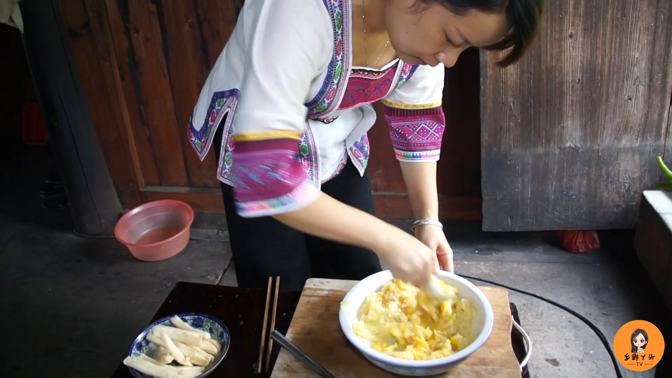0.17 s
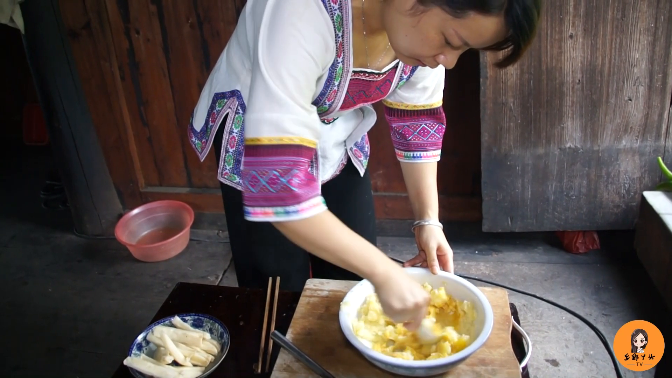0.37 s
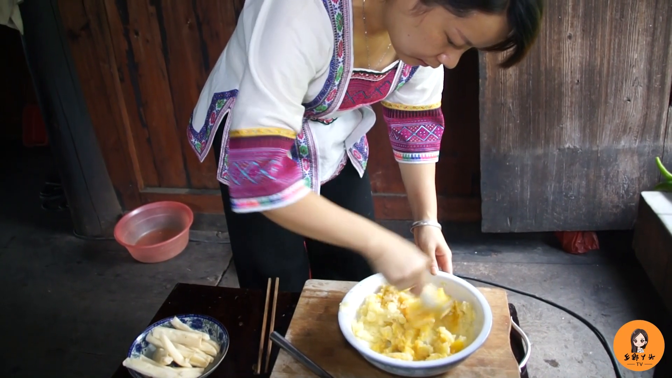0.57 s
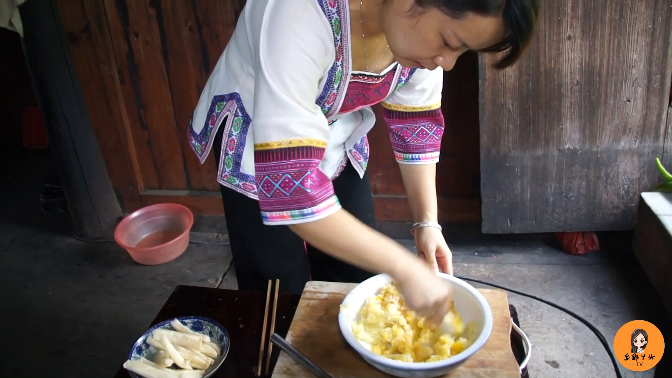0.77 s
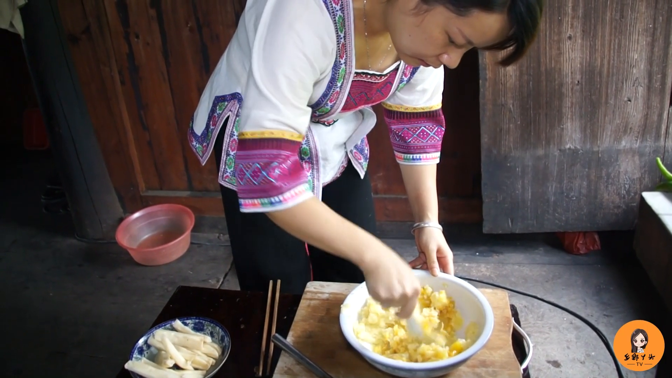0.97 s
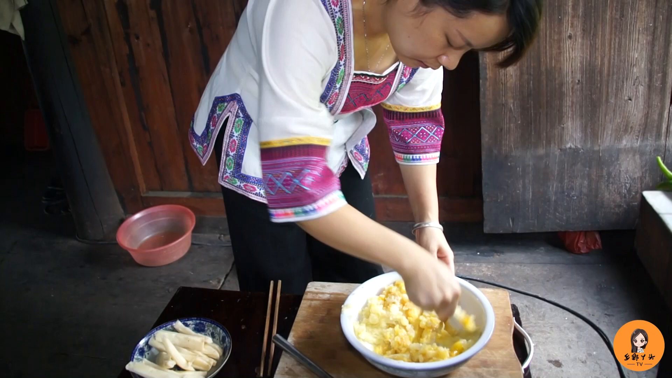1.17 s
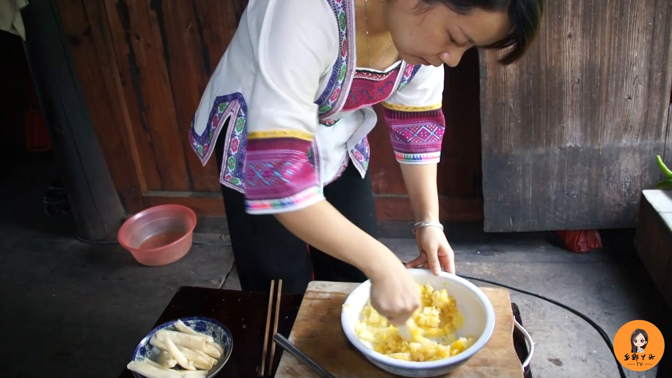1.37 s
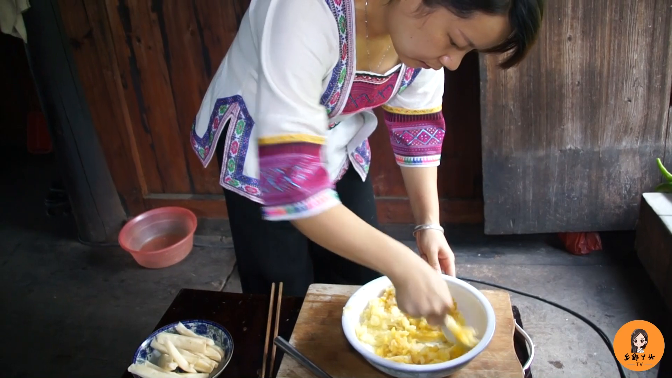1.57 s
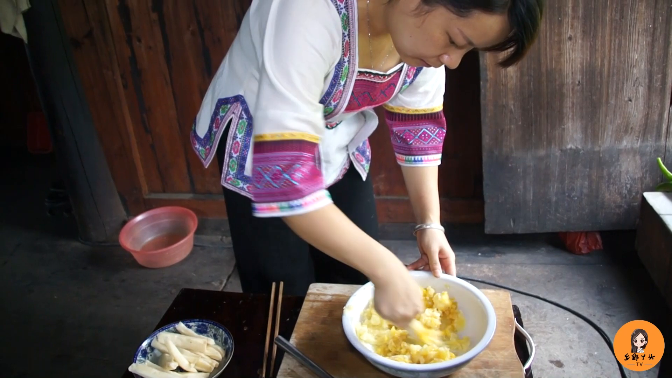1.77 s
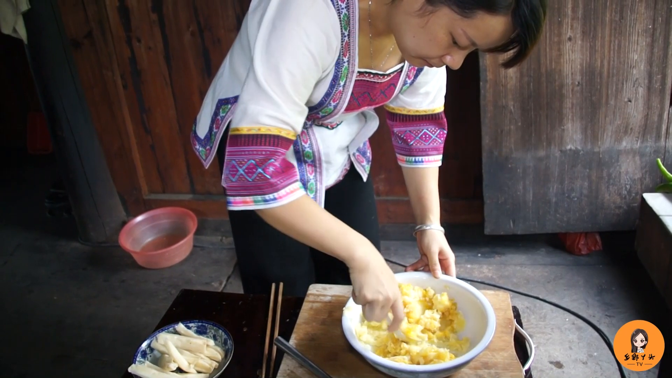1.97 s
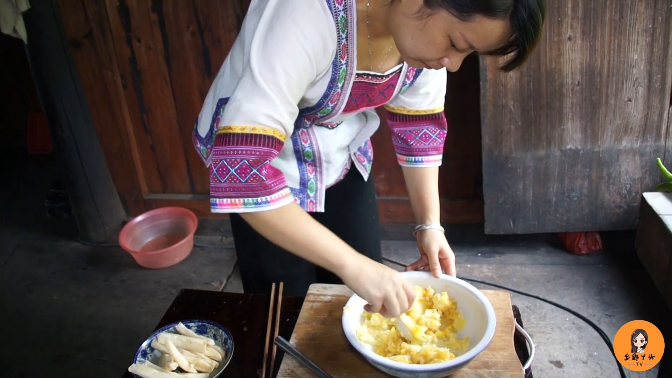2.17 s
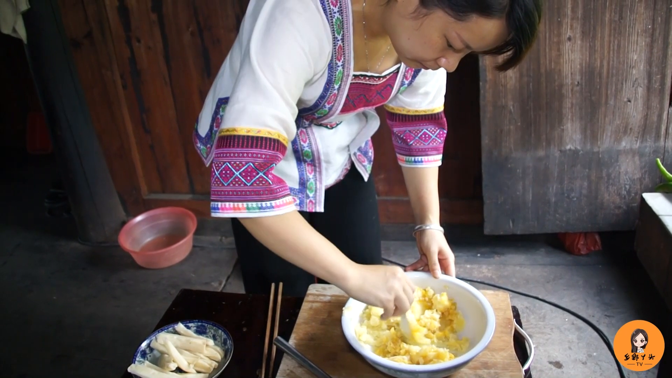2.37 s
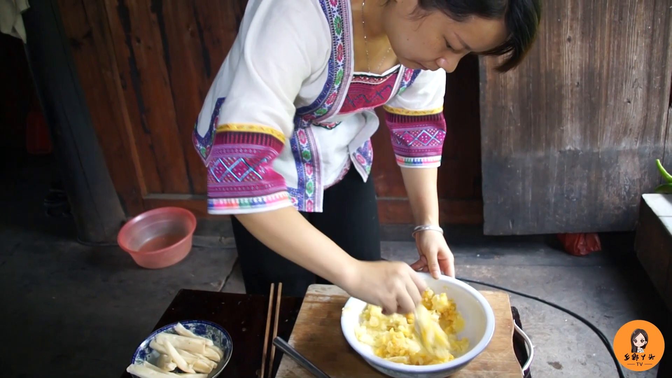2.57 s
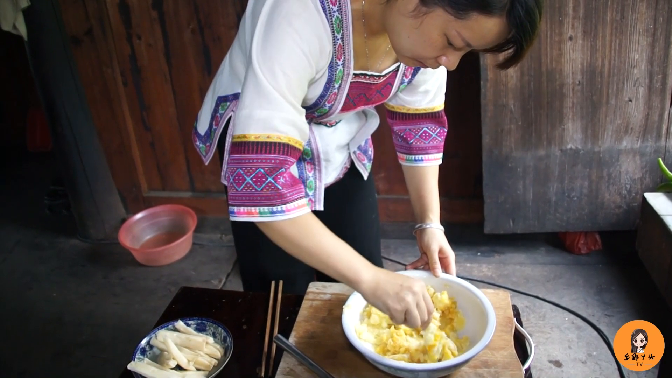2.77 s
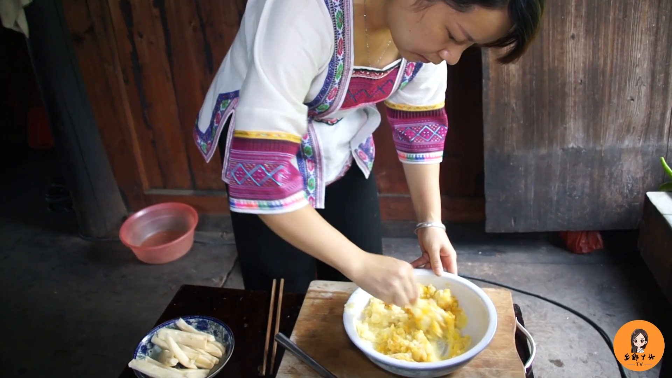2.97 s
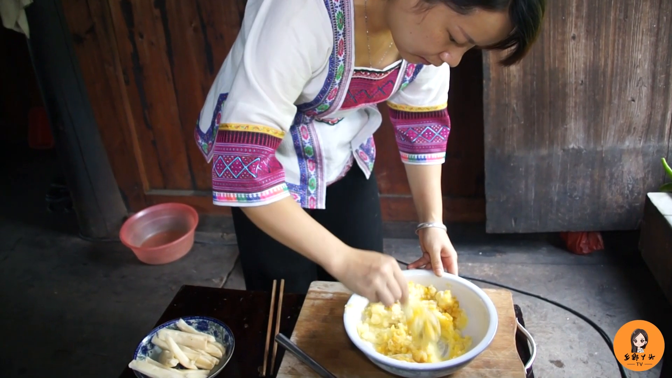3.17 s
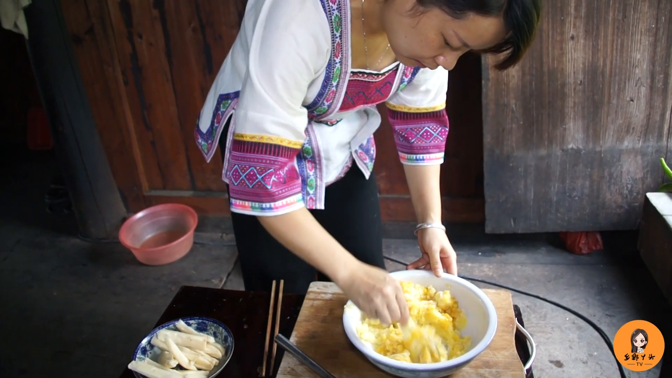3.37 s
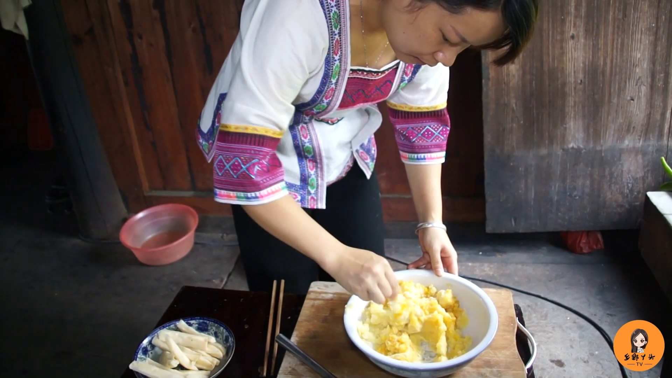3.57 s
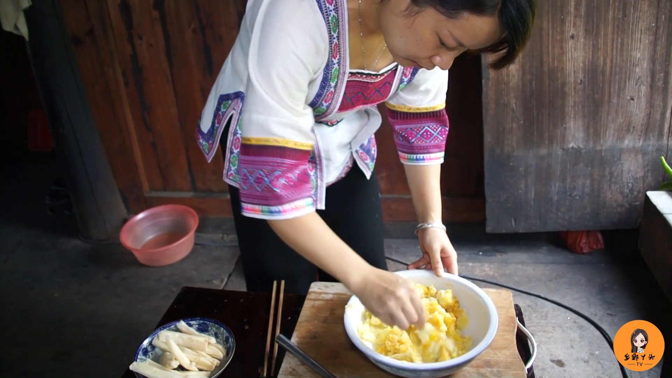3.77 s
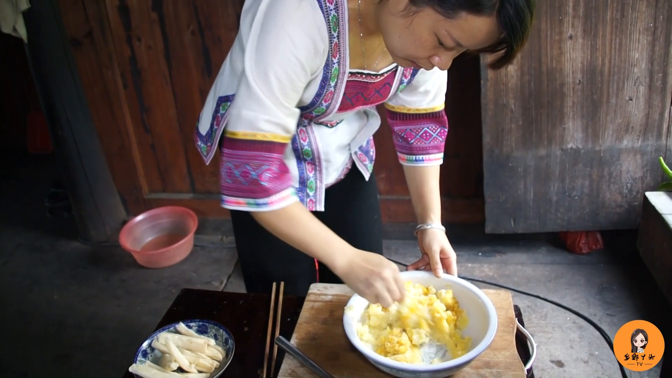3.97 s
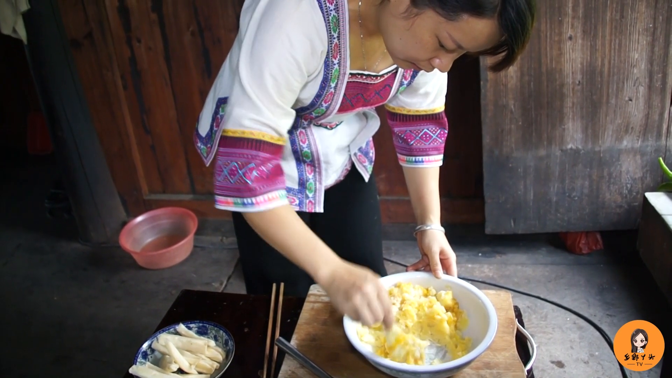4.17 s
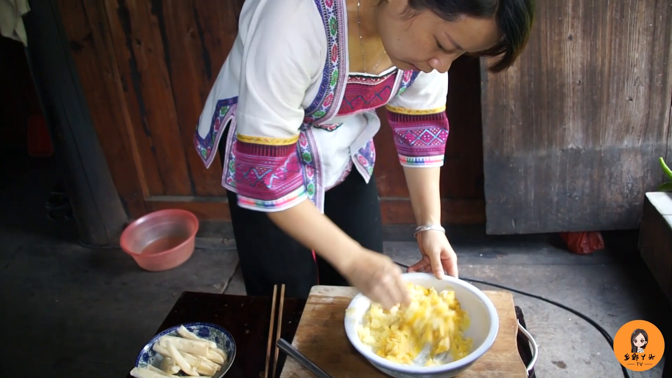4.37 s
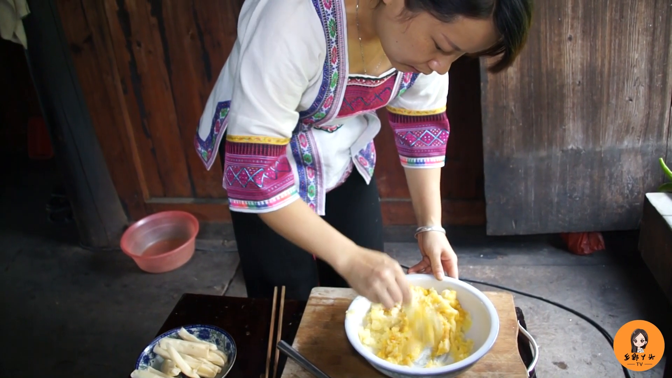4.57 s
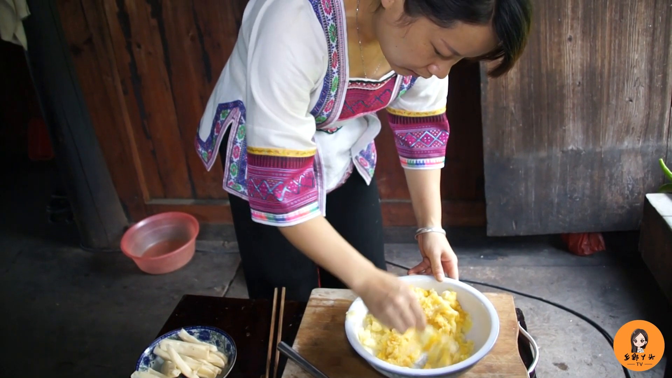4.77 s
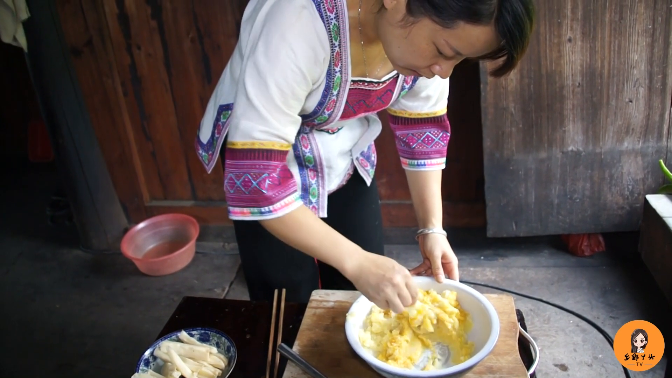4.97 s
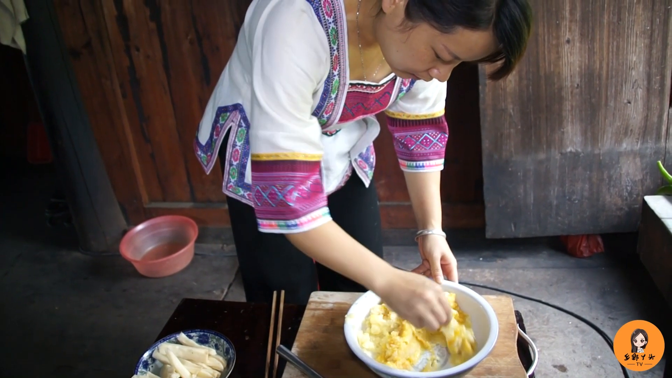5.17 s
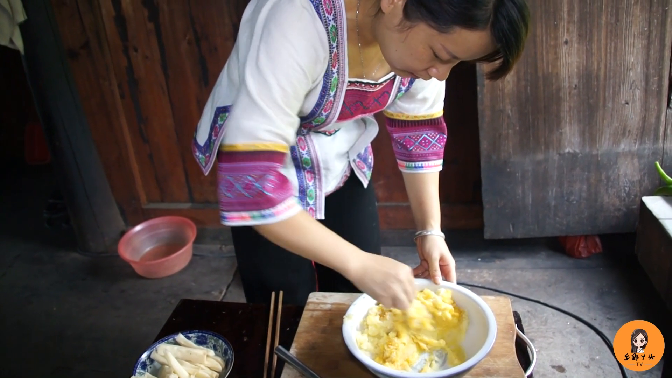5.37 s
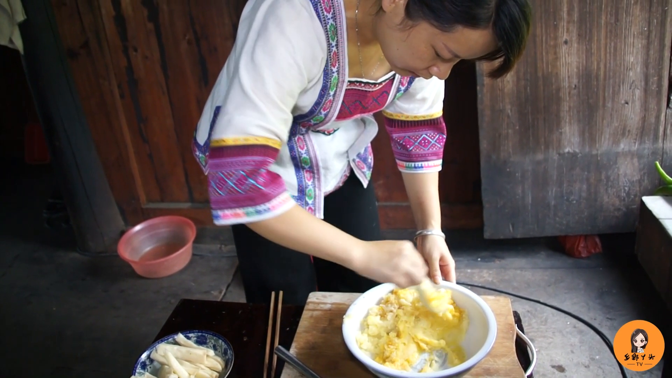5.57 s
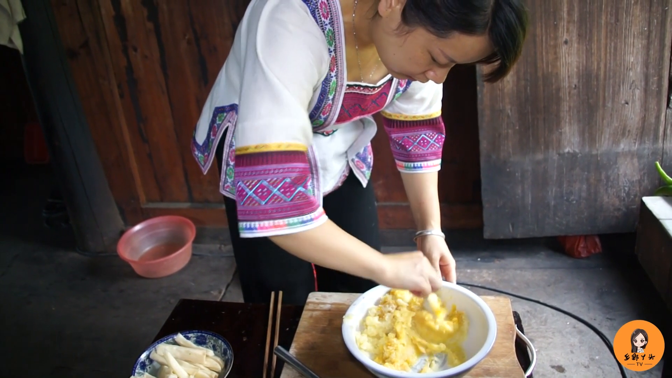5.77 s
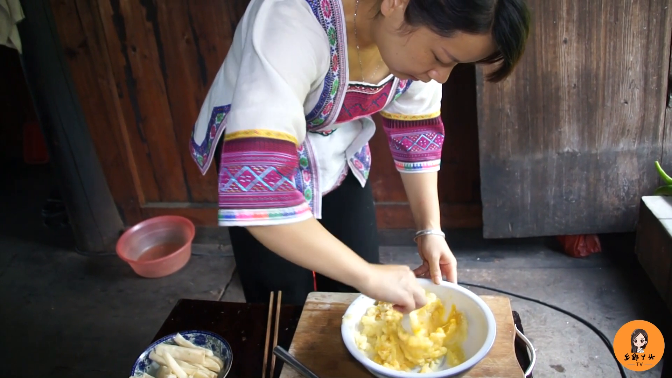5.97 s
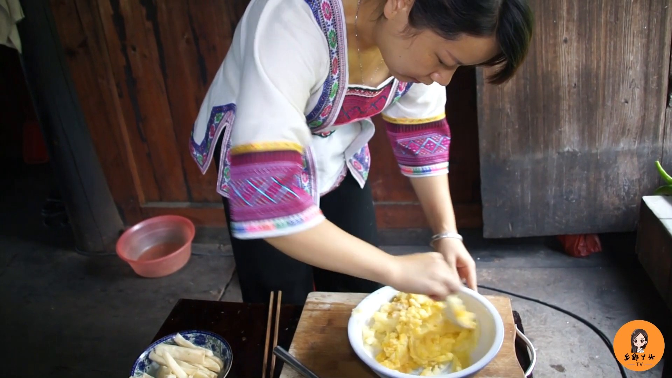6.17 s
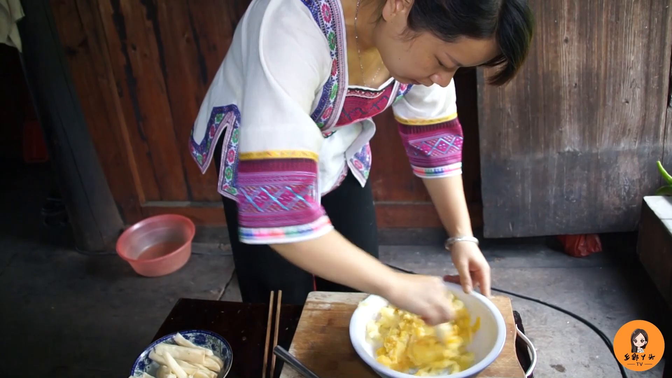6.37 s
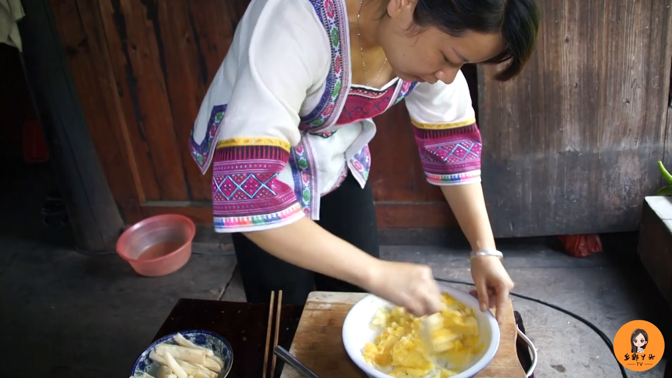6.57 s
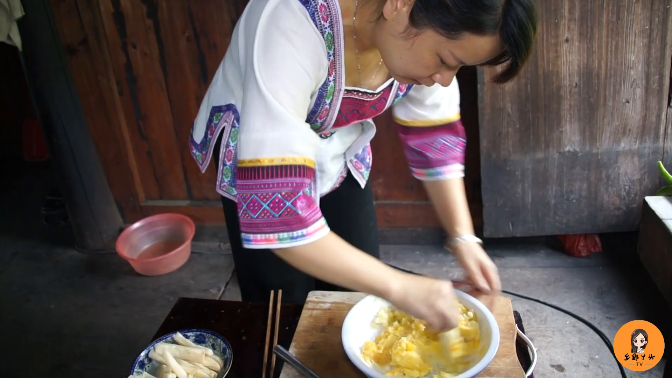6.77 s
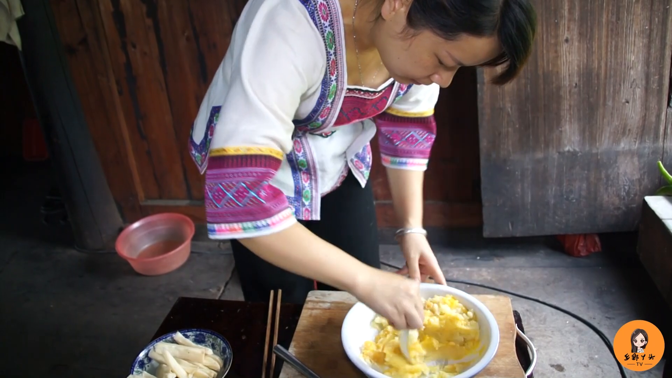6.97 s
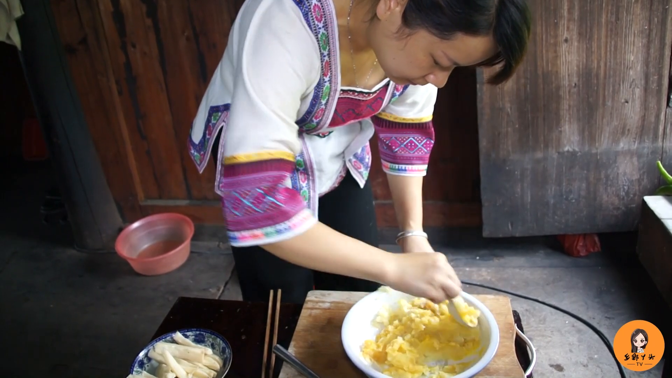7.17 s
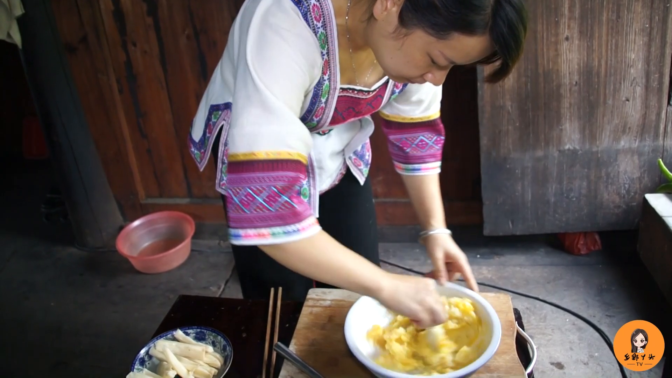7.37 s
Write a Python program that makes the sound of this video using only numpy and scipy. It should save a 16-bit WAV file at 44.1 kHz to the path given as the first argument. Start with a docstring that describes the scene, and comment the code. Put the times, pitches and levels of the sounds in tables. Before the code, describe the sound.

Over a low, steady room hush, a metal spoon works soft wet food in an enamel bowl on a wooden board. A very faint, thin tone sinks slightly and vanishes by 0.65 s. Strong clanks land at 0.2, 0.65 and 1.1 s, with a duller one at 1.3. A pause follows, holding only a tiny dry tick at 1.9. A loud bright clank breaks it at 2.65, then weaker, muffled knocks at 2.9 and 3.3. Firm knocks continue at 3.75, 4.2, 4.7, 5.15, 5.7, 6.25 and 6.75, some trailed by light secondary taps; a softer one ends it at 7.25. Each has a hard click, short enamel ring and dense echo fading within half a second. Small squelches and a few tiny pops fall between. From 6 s, faint board rubbing and soft low bumps join. Close stereo, slightly hollow.

```python
"""A metal spoon knocks an enamel bowl on a board while food is stirred, in a hard-walled wooden kitchen.
Each knock is a coloured click plus short fading tones of bowl and spoon and low resonances of the room;
dense echoes draw it out. Trains of tiny slips make the bowl rub on the board and the food squelch;
short rising tones are bubbles. A few low bumps come late, a thin sinking tone hangs at the start,
and shaped noise is the room hush. A two-port microphone colours it all."""
import sys
import numpy as np
from scipy import signal
from scipy.io import wavfile
from scipy.ndimage import uniform_filter1d

SR = 44100
rng = np.random.default_rng(int(sys.argv[2]) if len(sys.argv) > 2 else 0)


def store_wav(level_fs):
    """Save 16-bit WAV to argv[1]."""
    pcm = np.round(np.clip(np.atleast_2d(level_fs), -1, 1) * 32767)
    wavfile.write(sys.argv[1], SR, pcm.T.astype(np.int16))


N = 327663  # length of the scene in samples


def gain_of(db):
    """Turns decibels into a gain."""
    return 10 ** (np.asarray(db) / 20)


def evened(x):
    """Scales a sound to an rms of 1."""
    return x / np.sqrt(np.mean(x ** 2) + 1e-20)


def read(points, hz):
    """Reads a table between its points, on a logarithmic pitch axis."""
    point_hz, value = np.transpose(points)
    return np.interp(np.log(hz + 1), np.log(point_hz + 1), value)


def add(mix, start_s, sound):
    """Mixes a two-channel sound in at its start time, cut off at the end of the scene."""
    part = mix[:, round(start_s * SR):][:, :sound.shape[1]]
    part += sound[:, :part.shape[1]]


def causal(db):
    """Makes a filter that never sounds before its input (minimum phase), from dB on rfft bins."""
    mirrored_db = np.concatenate([db, db[-2:0:-1]])
    log_gain = np.log(gain_of(mirrored_db))
    phase = -signal.hilbert(log_gain).imag
    return np.fft.ifft(np.exp(log_gain + 1j * phase)).real[:len(db) // 2]


def ring(t, hz, level_db, t60_s):
    """One struck tone; it fades by 60 dB in t60_s, as its energy drains away."""
    return gain_of(level_db - 60 * t / t60_s) * np.sin(2 * np.pi * hz * t)


# Spoon knocks on the bowl; levels are those before echoes and the microphone.
# start_s, blow_db (on the bowl), thud_db (reaching the board), tip_db (edge of the spoon landing),
# low_ring_db, high_ring_db, tilt_db_per_octave (food on the wall takes the highest tones first)
KNOCKS = [(0.2119, -12.5, -22.5, -15.5, -14, -25.5, -1.5), (0.6568, -11, -24.5, -8.5, -9.5, -14, 2.5),
          (1.1338, -12.5, -24, -15.5, -12.5, -15, -4.5), (1.3074, -19, -29, -21.5, -30.5, -35.5, -23),
          (1.422, -52, -55, -62, -64, -70, -5.5), (2.6392, -11, -17.5, -7, -7, -14, 4),
          (2.903, -28.5, -35, -34.5, -41, -49.5, -4.5), (3.3061, -25.5, -33.5, -38.5, -30, -46.5, -19),
          (3.42, -41, -49, -39, -52.5, -56, -9), (3.7603, -15.5, -25, -22, -19.5, -36, -19),
          (4.1758, -14.5, -20.5, -9.5, -13, -17, 4), (4.278, -19.5, -27, -23.5, -45, -36, 0),
          (4.339, -38.5, -40.5, -31, -42, -44, -17), (4.692, -15.5, -20, -16.5, -19, -26.5, -5),
          (4.773, -22, -38, -25, -36.5, -46.5, -8), (5.1623, -15, -23.5, -19.5, -16.5, -26.5, -15),
          (5.6795, -16, -28, -15, -15.5, -20, 2), (6.003, -43, -50.5, -39, -61, -68, 1),
          (6.2402, -14, -20.5, -13, -9.5, -17.5, -2.5), (6.409, -37, -48, -36, -50, -69, -4),
          (6.7422, -16, -25, -22.5, -16.5, -29.5, 0), (6.911, -49, -45.5, -44, -69.5, -55, -3.5),
          (7.236, -26, -32.5, -37, -22.5, -34.5, -15)]
# A small dull tick, nearly without echo: columns as for the knocks.
TICKS = [(1.902, -36.5, -41, -63, -50, -53.5, -16)]
# Colours of the click, pitch_hz and relative level_db: air in the bowl, board and food,
# spoon blade, spoon tip, enamel on steel.
BOWL_AIR = [(60, -83.5), (300, -36), (700, -1.5), (900, 0), (1150, -1), (1500, -10.5), (3000, -37.5),
            (9000, -92.5)]
BOARD_THUD = [(30, -84), (110, -56.5), (170, -11.5), (300, -14.5), (440, 3), (620, 3), (1000, -13.5),
              (2500, -49), (8000, -97)]
BLADE_CLACK = [(100, -87), (600, -24), (1300, -7), (2000, 13.5), (3200, 3), (4500, -26), (12000, -93)]
TIP_CRUNCH = [(300, -80.5), (2800, -23.5), (3700, -2.5), (4300, 4), (5200, -2.5), (7000, -27.5),
              (14000, -95)]
ENAMEL_CRACK = [(300, -82), (3500, -23), (5500, -1.5), (8500, -13), (9500, -14), (11500, -28.5),
                (13500, -59), (17000, -79.5)]
# Ringing tones of the bowl, low resonances of the kitchen set off by each thud,
# and short tones of the spoon: pitch_hz, relative level_db, t60_s
BOWL_TONES = [(1557.7, -4.5, .05), (1623.5, -6, .025), (2893, 3, 0.047), (2936, 0, .07),
              (2914, -5.5, 0.023), (3033, -8.5, .03), (4565, 0, .07), (4625, -3.5, 0.046),
              (4890, -5, 0.023), (6536, -13.5, .09), (5770, -20, 0.026), (7330, -23.5, .04),
              (7690, -25.5, 0.032), (8640, -23, .08)]
ROOM_TONES = [(440, 2.5, 0.14), (545, -8, 0.27), (647.6, -12, 0.13), (902, -7, .18), (1045, -5, 0.18),
              (1066, -4.5, 0.32)]
SPOON_TONES = [(4233, -5.5, .014), (1950, -8.5, 0.0096)]
CLACK_DB, CRACK_DB, ROOM_DB = -2.5, -2.3, -16  # against the blow, the tip and the thud
CONTACT_S = 0.0017  # the tones swell in over this time
SPOT_DB = 2  # typical spread of the bowl tones from knock to knock
SPLIT_HZ = 2900  # the tilt of the high ring turns around this pitch
FLOOR_HZ = 140  # bass below this is taken away


def knock(blow_db, thud_db, tip_db, low_ring_db, high_ring_db, tilt_db):
    """A click coloured by board, bowl air, spoon and enamel, then fading tones of bowl, room and spoon."""
    hz = np.fft.rfftfreq(2048, 1 / SR)
    t = np.arange(SR // 4) / SR
    out = np.zeros(len(t))
    clicks = (
        (blow_db, BOWL_AIR),
        (thud_db, BOARD_THUD),
        (blow_db + CLACK_DB, BLADE_CLACK),
        (tip_db, TIP_CRUNCH),
        (tip_db + CRACK_DB, ENAMEL_CRACK),
    )
    for peak_db, colour in clicks:
        click = causal(read(colour, hz))
        out[:len(click)] += gain_of(peak_db) * click / abs(click).max()

    rise = np.sin(np.pi / 2 * np.minimum(t / CONTACT_S, 1)) ** 2
    spots = rng.standard_normal(len(BOWL_TONES))  # the place of the blow favours some tones
    for (tone_hz, db, t60_s), lift in zip(BOWL_TONES, spots):
        if tone_hz < SPLIT_HZ / 1.5:
            group_db = low_ring_db
        else:
            group_db = high_ring_db + tilt_db * np.log2(tone_hz / SPLIT_HZ)
        out += ring(t, tone_hz, group_db + db + SPOT_DB * lift, t60_s) * rise
    for tones, struck_db in (ROOM_TONES, thud_db + ROOM_DB), (SPOON_TONES, tip_db):
        for tone_hz, db, t60_s in tones:
            out += ring(t, tone_hz, struck_db + db, t60_s) * rise
    no_bass = signal.butter(N=4, Wn=FLOOR_HZ, btype="high", fs=SR, output="sos")
    return signal.sosfilt(no_bass, out)


def slips(count, rate, spread_db):
    """Uneven train of tiny slips, about rate per second, a few of them large."""
    boost_db = spread_db * np.minimum(rng.exponential(1, count), 4)
    size = gain_of(boost_db) * rng.standard_normal(count)
    return size * (rng.random(count) < rate / SR)


# Bowl rubbing the board and food sliding: start_s, length_s, level_db (rms before fades and echoes)
RUBS = [(0.0, 0.049, -49), (6.0, 0.2, -50.5), (6.37, 0.28, -46.5), (6.851, 0.098, -48), (7.12, 0.25, -54),
        (7.312, .2, -46.5)]
# Colour the body of the board gives the slips: pitch_hz, relative level_db
RUB_COLOUR = [(59, -66), (110, -34), (180, -12), (443, -0.5), (609, -8.5), (976, 3), (1400, -10),
              (1750, -7.5), (2360, -14.5), (4160, -14), (9000, -30), (11700, -41), (19800, -120)]
RUB_RISE_S, RUB_FALL_S = 0.04, 0.042


def rub(length_s, level_db):
    """Stick-slip under the bowl, through the body of the board: it swells, holds and lets go."""
    t = np.arange(0, length_s, 1 / SR)
    body = causal(read(RUB_COLOUR, np.fft.rfftfreq(2048, 1 / SR)))
    grain = signal.oaconvolve(slips(count=len(t), rate=900, spread_db=1.5), body)[:len(t)]
    swell = np.minimum(t / RUB_RISE_S, (length_s - t) / RUB_FALL_S)
    return evened(grain) * gain_of(level_db) * np.clip(swell, 0, 1)


# Wet food parting from the spoon:
# middle_s, level_db (rms before fades and echoes), length_s, centre_hz
SQUELCHES = [(0.185, -54, 0.015, 4900), (0.478, -53, 0.036, 4700), (0.951, -49, 0.03, 4820),
             (1.354, -61, 0.1, 5500), (2.407, -64.5, 0.11, 4460), (2.976, -49, 0.023, 4900),
             (3.113, -57, 0.035, 6000), (3.43, -61, 0.076, 4600), (3.527, -60, 0.03, 7000),
             (3.6, -60, .03, 6000), (3.996, -51.5, 0.059, 4540), (4.039, -59.5, 0.057, 6650),
             (4.327, -48, 0.12, 4670), (4.469, -57.5, 0.021, 6050), (4.829, -46.5, 0.081, 4700),
             (5.395, -56, 0.041, 6020), (5.638, -58.5, 0.02, 5000), (5.857, -53, 0.021, 5530),
             (6.526, -52.5, 0.028, 5540), (6.903, -53, 0.037, 4730), (7.194, -55, 0.061, 4140)]


def squelch(level_db, length_s, centre_hz):
    """A short cluster of wet crackles in a broad treble band with a tail upwards."""
    count = int(length_s * SR)
    band = [(centre_hz * 0.088, -70), (centre_hz * 0.64, -24), (centre_hz * 0.45, -2), (centre_hz, 0),
            (centre_hz * 1.7, -11), (centre_hz * 2.2, -32), (centre_hz * 3, -70)]
    colour = causal(read(band, np.fft.rfftfreq(1024, 1 / SR)))
    grain = signal.convolve(slips(count=count, rate=12000, spread_db=3.0), colour)[:count]
    return gain_of(level_db) * evened(grain) * np.hanning(count) ** .8


# Air pockets popping in the food: start_s, level_db (before fade and echoes), start_pitch_hz, t60_s
POPS = [(.006, -40.5, 4160, 0.015), (0.423, -38, 4130, 0.017), (0.457, -42, 6030, .01),
        (0.64, -49, 5200, 0.043), (4.997, -25, 4134, 0.0064), (5.413, -50.5, 5960, 0.017)]


def pop(level_db, start_hz, t60_s):
    """A small bubble: one short fading tone that rises a little."""
    t = np.arange(SR // 20) / SR
    fade = gain_of(level_db - 60 * t / t60_s)
    onset = np.minimum(t / 0.000956, 1)
    return fade * np.sin(2 * np.pi * start_hz * t * (1 + 1.3 * t)) * onset


# Low soft bumps: time_s (one BUMP_S after the start), level_db (sets the strength of the push)
BUMPS = [(6.249, -55), (6.408, -54), (6.639, -64), (6.828, -54), (7.328, -58)]
BUMP_S = 0.0022


def bump(level_db):
    """One low push that swings back once without ringing, a little different at each port."""
    port_speed = np.array([[.8], [1.25]])
    u = np.arange(SR // 10) / SR / BUMP_S * port_speed
    return gain_of(level_db) * np.e * u * (2 - u) * np.exp(-u)


# Level of the thin tone: time_s, level_db (midway between the two channels)
TONE = [(0, -58), (.12, -64), (.2, -59), (.42, -48), (.51, -64), (.57, -54), (.65, -63)]
TONE_HZ, SINK_HZ_PER_S = 1832, 74


def tone():
    """A faint thin tone that sinks slowly and wavers in level, slightly louder on the left."""
    s, level_db = np.transpose(TONE)
    t = np.arange(s[0], s[-1], 1 / SR)
    turns = np.cumsum(TONE_HZ - SINK_HZ_PER_S * t) / SR
    phase_lag = np.array([[.4], [0]])  # radians, left and right
    wave = np.sin(2 * np.pi * turns - phase_lag)
    return gain_of(np.interp(t, s, level_db)) * wave * gain_of([[1.5], [-1.5]])


def pair(frames, size, same, db):
    """Two-channel noise from random spectra: db shapes bins and frames, same sets the likeness."""
    a, b, c, d = rng.standard_normal((frames, size // 2 + 1, 4)).T
    like = np.clip(read(same, np.fft.rfftfreq(size, 1 / SR)), -1, 1)[:, None]
    left = a + 1j * b
    right = like * left + np.sqrt(1 - like ** 2) * (c + 1j * d)
    spectra = np.array([left, right]) * gain_of(db)
    return signal.istft(spectra, nperseg=size, noverlap=size - size // 4)[1]


# Colour of the hush: pitch_hz, relative level_db (per Hz)
HUSH = [(25, -11.5), (113, -18), (436, 0.5), (600, -7), (900, 1), (1400, -6.5), (2100, -9.5), (2800, -6),
        (4300, -9), (6400, -17), (7100, -10.5), (7800, -18), (13300, -29.5), (13800, -56.5)]
# How alike left and right are in the hush: pitch_hz, likeness (1 = the same)
HUSH_SAME = [(60, 0.059), (400, 0.47), (1200, 0.11), (2500, 0.08), (5000, 0.016)]
HUSH_DB = -55.5  # rms level before the microphone colours it


def hush():
    """Steady room and microphone noise with faint drifting patches."""
    frames, hz = N // 256 + 5, np.fft.rfftfreq(1024, 1 / SR)
    smooth_in_time = uniform_filter1d(rng.standard_normal((frames, 513)), 20, 0)
    patches = evened(uniform_filter1d(smooth_in_time, 14, 1)).T
    db = read(HUSH, hz)[:, None] + 0.66 * patches
    noise = pair(frames=frames, size=1024, same=HUSH_SAME, db=db)
    return gain_of(HUSH_DB) * evened(noise[:, :N])


# How long the kitchen echoes take to fade by 60 dB: pitch_hz, t60_s
KITCHEN = [(100, 0.54), (500, 0.51), (1400, 0.49), (3700, 0.41), (9700, 0.44), (14000, 0.21)]
# How alike left and right are in the echoes: pitch_hz, likeness (1 = the same)
ECHO_SAME = [(60, 0.98), (450, 0.99), (1000, 0.62), (1700, 0.17), (3000, 0.008)]
ECHO_DB, TICK_ECHO_DB = 6, -19  # echoes against the direct sound, for knocks and for the tick


def heard(x, wet_db, gap_s=0.0014, early_db=5.5, early_s=0.0097):
    """Direct sound plus dense echoes, strongest from near walls; every sound has its own pattern."""
    hz, t = np.fft.rfftfreq(256, 1 / SR), np.arange(480) * 64 / SR
    fade_db = early_db * np.exp(-t / early_s) - 60 * t / read(KITCHEN, hz)[:, None]
    tail = pair(frames=480, size=256, same=ECHO_SAME, db=fade_db)
    echoes = gain_of(wet_db) * tail / np.linalg.norm(tail[0])
    response = np.pad(echoes, ((0, 0), (int(gap_s * SR), 0)))
    response[[1, 0], [0, 2]] += 1  # direct sound: the right port is nearer by two samples
    return signal.fftconvolve(x[None], response, axes=1)


def scene():
    """Knocks, rubs, squelches and pops in the kitchen, with bumps, over tone and hush."""
    mix = hush()
    add(mix, TONE[0][0], tone())
    for start_s, *row in KNOCKS:
        add(mix, start_s, heard(knock(*row), wet_db=ECHO_DB))
    for start_s, *row in TICKS:
        add(mix, start_s, heard(knock(*row), wet_db=TICK_ECHO_DB))
    for time_s, level_db in BUMPS:
        add(mix, time_s - BUMP_S, bump(level_db))
    for start_s, *row in POPS:
        add(mix, start_s, heard(pop(*row), wet_db=0))
    for start_s, *row in RUBS:
        add(mix, start_s, heard(rub(*row), wet_db=1.5))
    for middle_s, level_db, length_s, centre_hz in SQUELCHES:
        sound = squelch(level_db, length_s, centre_hz)
        add(mix, middle_s - length_s / 2, heard(sound, wet_db=1.0))
    return mix


# Dips from echoes inside the microphone housing: pitch_hz, width_hz, depth_db
PORT_DIPS = [(1370, 250, -8.5), (2368, 97.5, -29), (3379, 440, -8.5)]
EDGE_HZ = 16000  # the treble ends here


def record(dry):
    """Dips of the microphone housing, overload at full scale, then a steep treble limit."""
    hz = np.fft.rfftfreq(4096, 1 / SR)
    dips_db = sum(db / (1 + (2 * (hz - f) / width) ** 2) for f, width, db in PORT_DIPS)
    coloured = signal.oaconvolve(dry, causal(dips_db)[None], axes=1)[:, :N]
    edge = signal.firwin(511, EDGE_HZ, window=("kaiser", 9), fs=SR)
    return signal.oaconvolve(np.clip(coloured, -1, 1), edge[None], "same")


dry = scene()
out = record(dry)
store_wav(out)
```